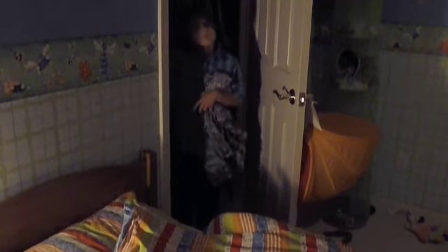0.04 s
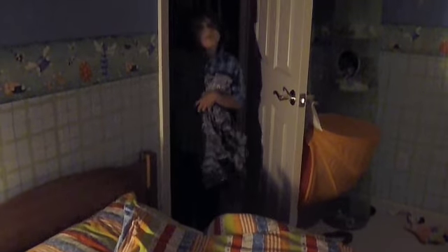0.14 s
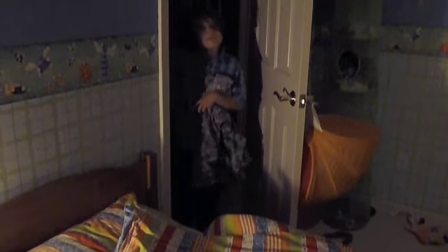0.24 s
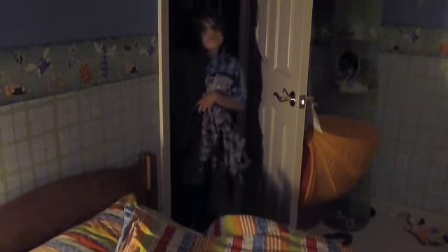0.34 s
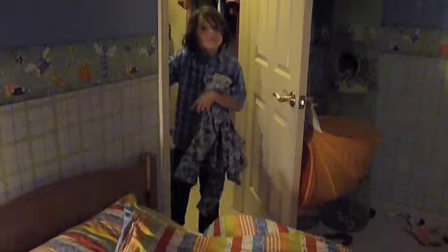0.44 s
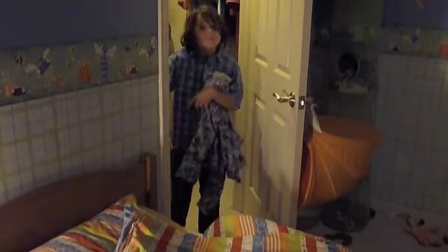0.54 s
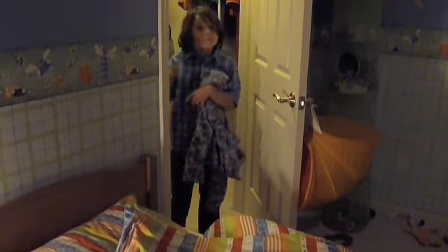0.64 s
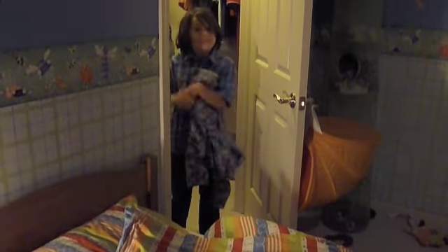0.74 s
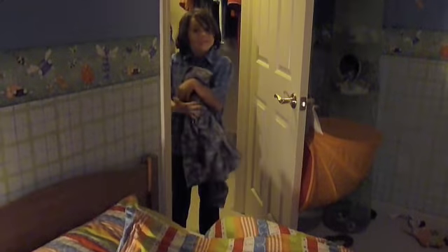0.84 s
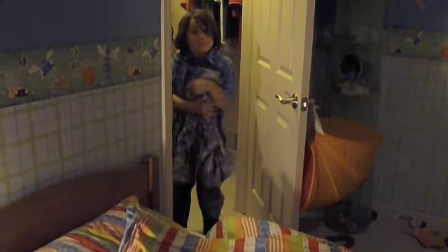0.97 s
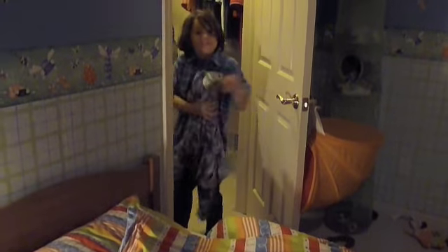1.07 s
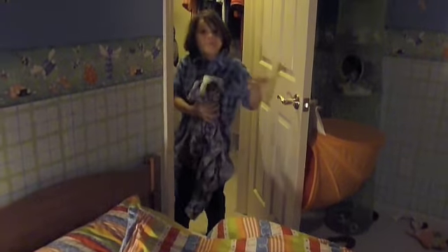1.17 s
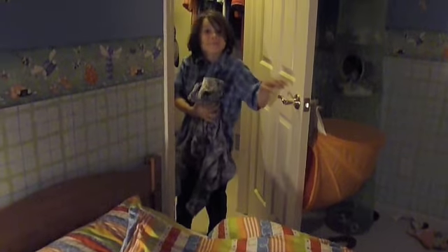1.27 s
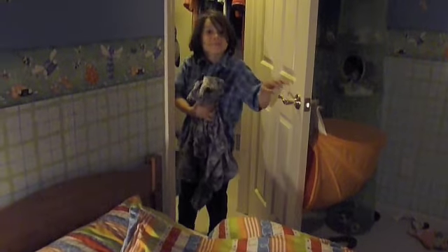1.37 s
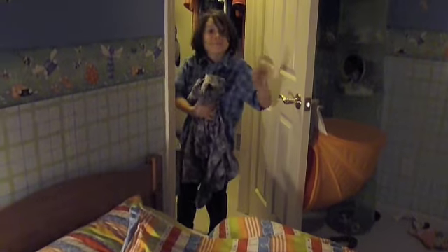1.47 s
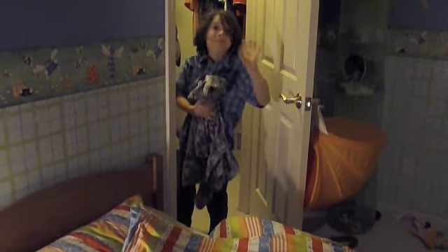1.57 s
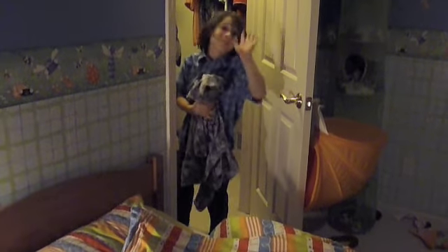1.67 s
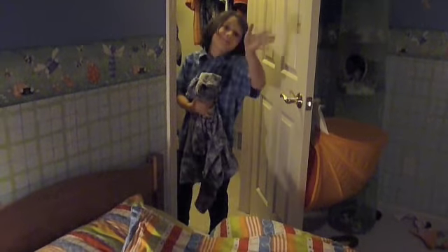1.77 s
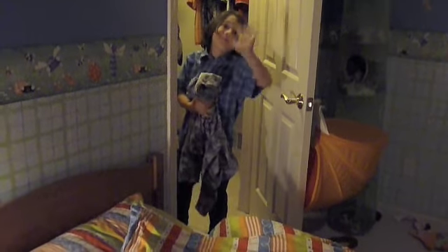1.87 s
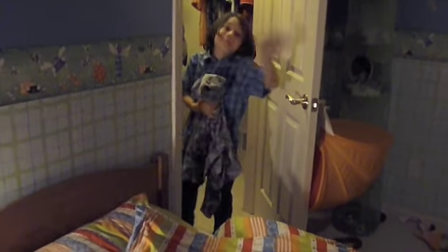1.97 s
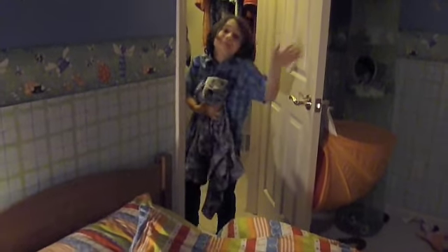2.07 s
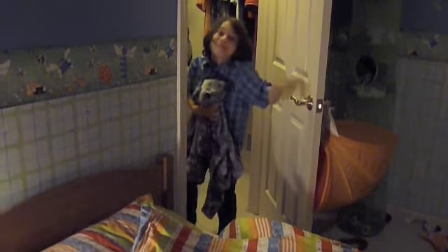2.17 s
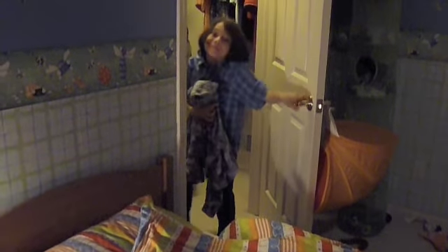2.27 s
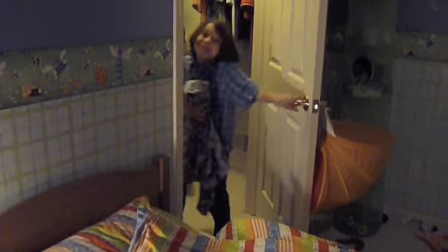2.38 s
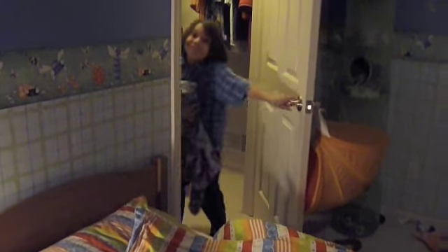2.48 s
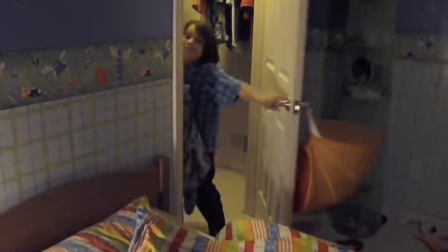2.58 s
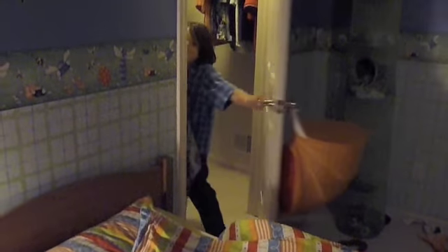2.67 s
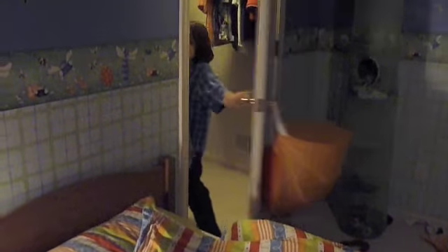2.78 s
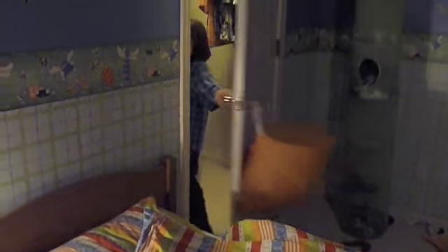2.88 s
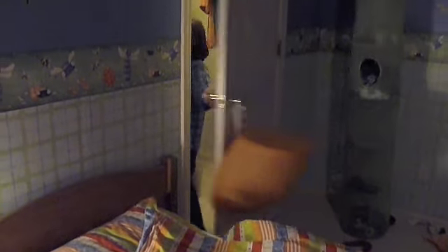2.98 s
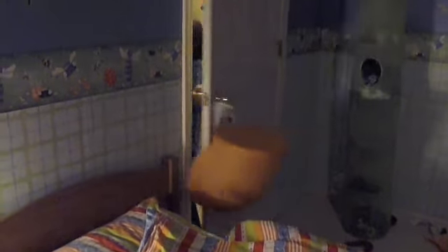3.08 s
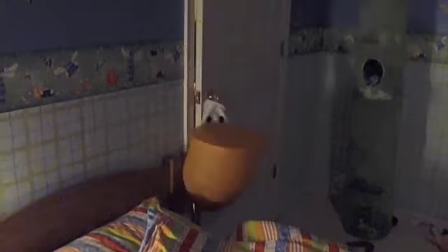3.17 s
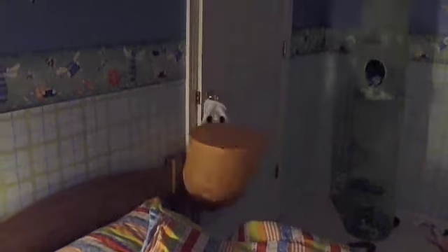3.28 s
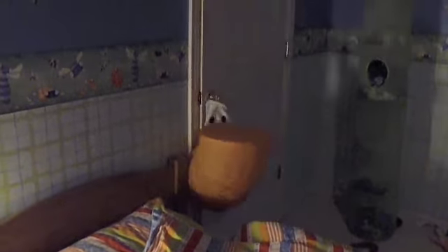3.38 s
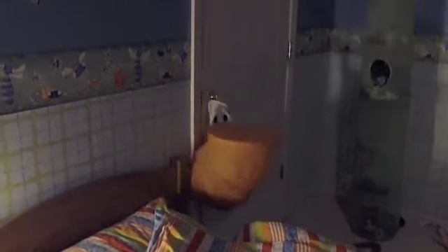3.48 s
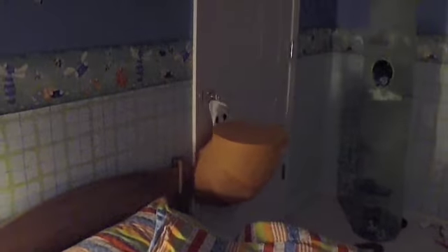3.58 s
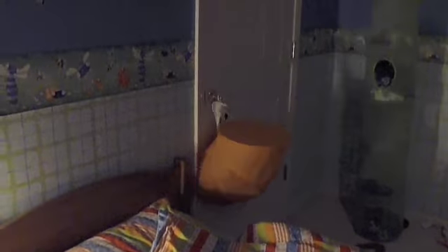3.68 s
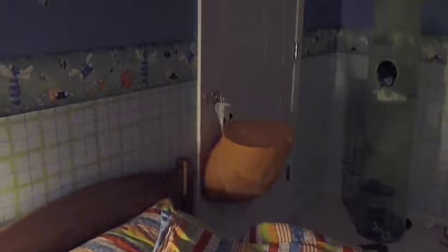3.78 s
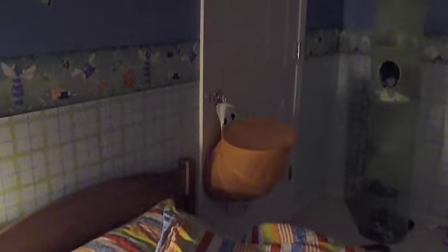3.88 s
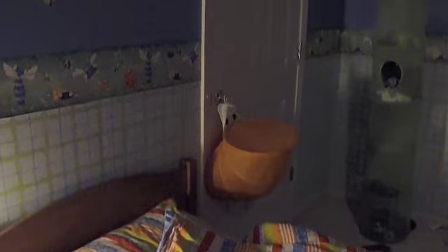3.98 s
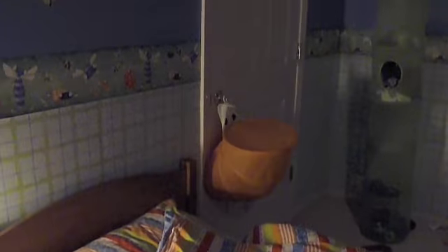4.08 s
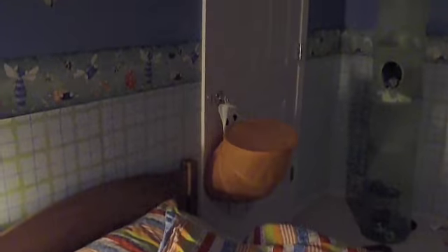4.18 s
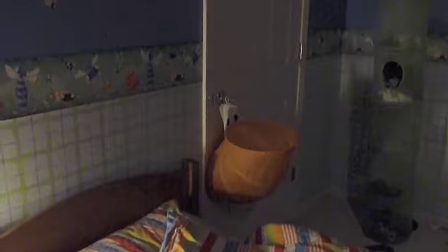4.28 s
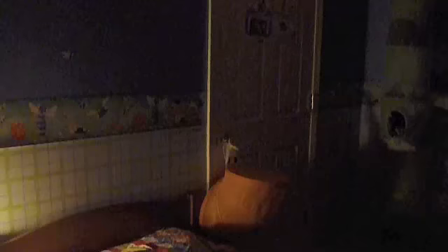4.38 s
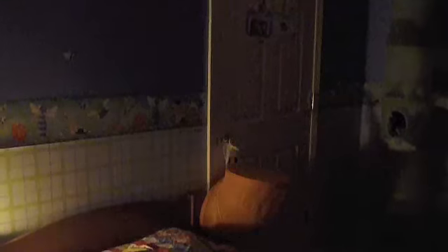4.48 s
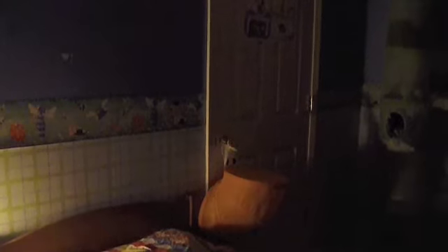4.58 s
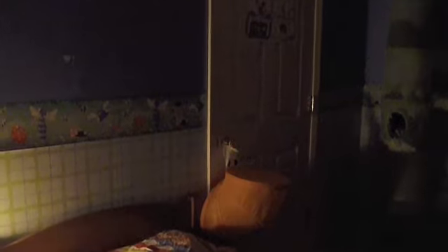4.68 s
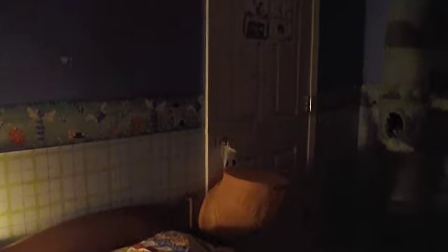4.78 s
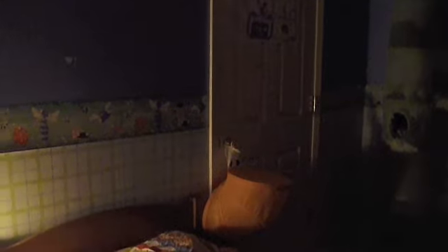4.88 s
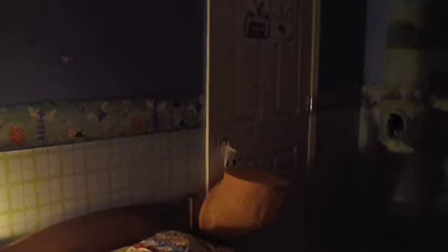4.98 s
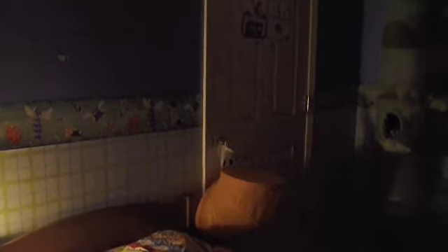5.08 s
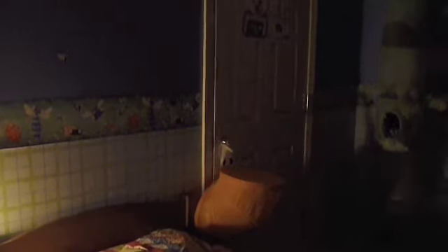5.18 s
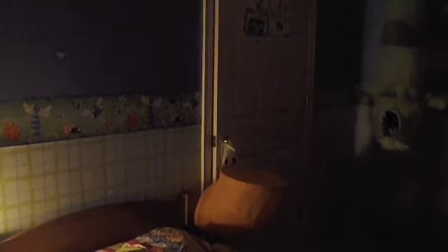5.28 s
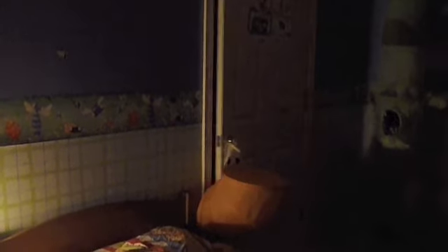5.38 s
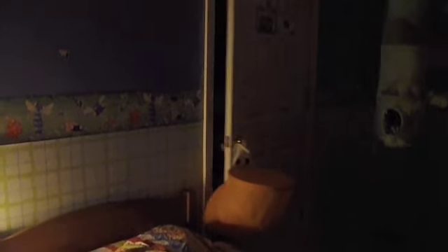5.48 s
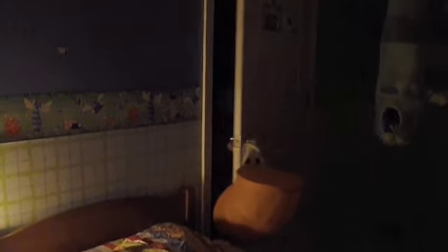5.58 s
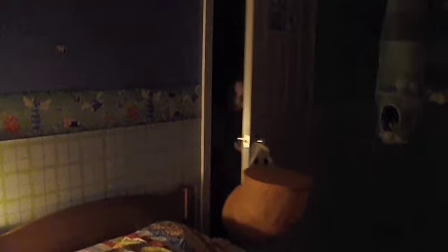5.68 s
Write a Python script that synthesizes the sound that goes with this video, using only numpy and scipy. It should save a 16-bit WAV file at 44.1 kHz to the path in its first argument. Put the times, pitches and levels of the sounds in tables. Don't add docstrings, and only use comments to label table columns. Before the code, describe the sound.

A light switch snaps, a door squeaks briefly and slams shut with latch clatter; after a short dip to silence, the handle rattles and the door eases open.

```python
import sys
import numpy as np
from scipy import signal
from scipy.fft import rfft, irfft
from scipy.io import wavfile
from scipy.ndimage import uniform_filter1d

SR = 44100
rng = np.random.default_rng(int(sys.argv[2]) if len(sys.argv) > 2 else 0)


def to_wav(sig):
    pcm = np.clip(np.atleast_2d(sig), -1, 1) * 32767
    pcm = np.round(pcm).astype(np.int16)
    wavfile.write(sys.argv[1], SR, pcm.T)


def amplitude_ratio(level_db):
    exponent = np.asarray(level_db, float) / 20
    return 10 ** exponent


N = 253154


def unit(x):
    return x / np.sqrt(np.mean(x ** 2))


def peak(x, db):
    return x * amplitude_ratio(db) / np.abs(x).max()


def band(x, lo_hz, hi_hz):
    return signal.sosfilt(signal.butter(2, [lo_hz, hi_hz], "bandpass", fs=SR, output="sos"), x)


def colour(x, points):
    hz, db = np.transpose(points)
    f = np.arange(len(x) // 2 + 1) * SR / len(x) + 1
    return irfft(rfft(x) * amplitude_ratio(np.interp(np.log(f), np.log(hz), db)), len(x))


def walk(rate_hz):
    hold = int(SR / rate_hz)
    levels = np.repeat(rng.standard_normal(N // hold + 1), hold)
    return uniform_filter1d(uniform_filter1d(levels, hold), hold)[:N]


# frequency in Hz, density in dB per Hz.
HOUSE_SPECTRUM = [(18, -52), (30, -13.5), (101, -2), (161, -1), (292, -2), (313, -4), (368, -5.5),
                  (582, -9), (624, -7), (1530, -16.5), (1760, -18.5), (6510, -28), (7300, -28.5),
                  (9490, -44), (16100, -120)]


def house():
    noise = colour(rng.standard_normal(N), [(5, -71)] + list(HOUSE_SPECTRUM))
    low = signal.sosfilt(signal.butter(2, 900, fs=SR, output="sos"), noise)
    wander = amplitude_ratio(0.5 * walk(1) + 1.3 * walk(24))
    whine_hz, whine_db, house_db = 6700, -78.5, -50.5
    whine = unit(band(rng.standard_normal(N), 0.97 * whine_hz, 1.03 * whine_hz)) * amplitude_ratio(whine_db)
    return unit(noise + low * (wander - 1)) * amplitude_ratio(house_db) + whine


# frequency in Hz, reverberation time t60 in seconds.
ROOM_DECAY = [(60, 1), (250, 0.54), (1000, 0.37), (3000, 0.35), (7000, 0.43)]


def room(x):
    reverb_db, onset_s = -8.5, 0.0023
    t, tail = np.arange(SR // 2) / SR, 0
    decay_hz, decay_s = np.transpose(ROOM_DECAY)
    for hz in 45 * 2 ** np.arange(0, 8.0):
        t60 = np.interp(np.log(hz), np.log(decay_hz), decay_s)
        octave = band(rng.standard_normal(len(t)), hz / 2 ** 0.5, hz * 2 ** 0.5)
        tail = tail + octave * np.exp(-np.log(1000) * t / t60)
    tail = tail * np.clip(t / onset_s, 0, 1)
    tail = tail / np.sqrt(np.sum(tail ** 2))
    return x + amplitude_ratio(reverb_db) * signal.fftconvolve(x, tail)[:N]


# start in seconds, hold in seconds, level in dB, tilt in dB, fade in dB per second.
DRAGS = [
    (2.211, 0.0062, -39.5, -6.5, 403),
    (2.402, 0.25, -45.5, 1, 54.5),
    (2.975, 0.045, -40.5, -5, 84),
    (3.211, 0.61, -38, 3, 88.5),
    (5.076, 0.059, -43, -3.2, 40),
    (5.36, 0.074, -44.5, 7, 77),
]


def drag():
    attack_s = 0.048
    out, t = 0, np.arange(N) / SR
    grains = unit(rng.standard_normal(N) * amplitude_ratio(1.7 * walk(200)))
    rumble, rustle = unit(band(grains, 140, 850)), unit(band(grains, 720, 4500))
    for start_s, hold_s, db, tilt_db, fade in DRAGS:
        age = t - start_s
        rise = np.clip(age / attack_s, 0, 1)
        gain = rise * amplitude_ratio(db - 5.5 - fade * np.clip(age - attack_s - hold_s, 0, 2))
        out = out + gain * (rumble * amplitude_ratio(-tilt_db) + rustle * amplitude_ratio(tilt_db - 22))
    return out


def mode(push, hz, t60):
    t = np.arange(len(push)) / SR
    ringing = np.sin(2 * np.pi * hz * t) * np.exp(-np.log(1000) * t / t60)
    return signal.fftconvolve(push, ringing)[:len(t)]


def rings(rows, t60, swell_ms, split):
    out, t = np.zeros(N + SR), np.arange(SR // 2) / SR
    middle_hz = np.median([row[2] for row in rows])
    for start_s, db, hz in rows:
        decay_s = t60 * (middle_hz / hz) ** 0.3
        roughness = 1 + 0.5 * rng.standard_normal(len(t))
        push = roughness * np.sin(2 * np.pi * hz * t) * np.exp(-1000 * t / swell_ms)
        twin_hz = hz * (1 + split * rng.uniform(-1.41, 1))
        pair = mode(push, hz, decay_s) + 0.94 * mode(push, twin_hz, decay_s)
        start = int(start_s * SR)
        out[start:start + len(t)] += peak(pair, db - 3)
    return out[:N]


# start in seconds, peak level in dB, pitch in Hz.
PUFFS = [
    (2.239, -53, 40.4),
    (3.049, -42, 40.4),
    (3.299, -46.5, 40.4),
    (3.605, -35, 40.4),
    (3.849, -44.5, 64),
    (4.199, -49, 59.2),
    (5.099, -48, 45.8),
    (5.279, -45.5, 70.0),
    (5.649, -61, 40.4),
]


def air_puffs():
    return rings(PUFFS, t60=0.19, swell_ms=26, split=0.3)


# start in seconds, peak level in dB, pitch in Hz.
PLATE = [
    (.397, -33.5, 1690),
    (.40, -46.5, 3370),
    (1.29, -50, 1495),
]


def switch_plate():
    return rings(PLATE, t60=0.058, swell_ms=2.4, split=0.03)


# start in seconds, peak level in dB, pitch in Hz.
PINGS = [(.394, -29.5, 755), (.399, -55, 4750), (2.236, -26, 619), (3.183, -25.5, 2460), (3.184, -32, 3720),
         (3.333, -30, 4070), (3.333, -28.5, 1130), (3.339, -28.5, 1990), (3.607, -19.5, 1111),
         (3.608, -16, 768), (3.611, -24.5, 1460), (5.054, -43, 3250), (5.10, -44.5, 2600),
         (5.165, -41, 2980), (5.175, -29.5, 1222), (5.197, -29, 990), (5.445, -43, 2600), (5.615, -37, 773),
         (5.635, -40.5, 1140)]


def metal_pings():
    return rings(PINGS, t60=0.034, swell_ms=2.3, split=0.07)


# start in seconds, peak level in dB, pitch in Hz.
DRUMS = [(0.409, -40, 274), (2.248, -30.5, 268), (2.288, -27.5, 231), (2.459, -30.5, 270),
         (2.999, -29, 189.4), (3.181, -31, 289), (3.191, -32, 454), (3.334, -20.5, 322),
         (3.363, -18, 280.5), (3.409, -34, 333), (3.611, -17, 224.4), (3.669, -26, 194), (3.949, -23, 386),
         (3.989, -32.5, 381), (5.07, -33, 199), (5.249, -31.5, 173.5), (5.394, -33, 447)]


def panel_drums():
    return rings(DRUMS, t60=0.088, swell_ms=4.6, split=0.23)


# start in seconds, peak level in dB, pitch in Hz.
BOOMS = [(2.251, -40.5, 73), (2.309, -32, 71.6), (2.992, -38.5, 90), (3.059, -49, 97.04), (3.181, -37, 130),
         (3.338, -51.5, 79), (3.606, -24.5, 106.2), (3.65, -23.5, 136.3), (3.698, -26.5, 64),
         (3.757, -35, 70), (4.299, -42.5, 101), (4.541, -42, 118.3), (5.058, -42.5, 109),
         (5.169, -41, 125.4), (5.26, -39, 137.7)]


def leaf_booms():
    return rings(BOOMS, t60=0.27, swell_ms=10, split=0.16)


# frequency in Hz, swell in dB, width in Hz.
HINGE_PEAKS = [(1370, -2, 16), (2410, 9.5, 54), (2740, 8, 73), (2945, 12, 54), (3190, 9.5, 69)]


def hinge(rows, fall_db, waver, flutter_db, haze):
    s, *columns = np.transpose(rows)
    t = np.arange(N) / SR
    slip_hz, db = (np.interp(t, s, column) for column in columns)
    phase = 2 * np.pi * np.cumsum(slip_hz * (1 + waver * walk(700))) / SR
    swell_db = 0
    for at_hz, rise_db, width_hz in HINGE_PEAKS:
        swell_db = swell_db + rise_db * np.exp(-((slip_hz - at_hz) / width_hz) ** 2 / 2)
    grit = 1 + haze * walk(1500)
    overtones = 0
    for k in range(1, 6):
        level = amplitude_ratio(db + k * fall_db + flutter_db * walk(150))
        overtones = overtones + level * np.sin((k + 1) * phase)
    lowest = amplitude_ratio(db + swell_db + flutter_db * walk(120)) * np.sin(phase)
    moving = (t > s[0]) * (t < s[-1])
    return band((lowest + overtones * grit) * moving, 220, 5800)


# time in seconds, slip rate in Hz, level in dB.
GROAN = [
    (2.432, 1050, -50),
    (2.441, 900, -38),
    (2.468, 330, -39),
    (2.485, 280, -52),
]


def hinge_groan():
    return hinge(GROAN, fall_db=-14, waver=0.03, flutter_db=1.5, haze=0.3)


# time in seconds, slip rate in Hz, level in dB.
SQUEAK = [
    (2.472, 1534, -64),
    (2.484, 1343, -43.5),
    (2.513, 1435, -41),
    (2.534, 2033, -41.5),
    (2.588, 2600, -41),
    (2.648, 3227, -44),
    (2.69, 3457, -50),
    (2.73, 3350, -65),
    (2.83, 3320, -75.5),
]


def hinge_squeak():
    grip_lost_s, fade_s = 2.646, 0.026
    fall_db = np.interp(np.arange(N) / SR, [grip_lost_s, grip_lost_s + fade_s], [-2, -30])
    return hinge(SQUEAK, fall_db, waver=0.012, flutter_db=3.5, haze=0.6)


def cluster(push, lo_hz, hi_hz, t60):
    keep = np.exp(-np.log(1e6) / (t60 * SR))
    power = signal.lfilter([1], [1, -keep], push ** 2)
    return band(rng.standard_normal(len(push)) * np.sqrt(power), lo_hz, hi_hz)


def rebounds(bounces):
    return [(start_s + k * gap_ms / 1000, db - k * 3.5, hard_db)
            for start_s, db, hard_db, gap_ms in bounces for k in range(3)]


def contacts(hits, panel_db, tick_db, sheen_db, scatter_ms, thinning, dryness=1):
    out, t = np.zeros(N + SR), np.arange(SR // 3) / SR
    for start_s, db, hard_db in hits:
        age = 1000 * t / scatter_ms
        push = rng.standard_normal(len(t)) ** 3 * np.exp(-age) * np.clip(11 * age + 0.16, 0, 1)
        clusters = [
            (150, 461, 0.13, panel_db - thinning * hard_db - 0.5),
            (447, 1440, 0.063, 0),
            (1860, 3740, 0.071, tick_db + hard_db),
            (3500, 6700, 0.042, sheen_db + hard_db)]
        start = int(start_s * SR)
        for lo_hz, hi_hz, t60, part_db in clusters:
            part = cluster(push, lo_hz, hi_hz, t60 * dryness)
            out[start:start + len(t)] += peak(part, db - 3 + part_db)
    return out[:N]


# start in seconds, peak level in dB, hardness in dB.
BATTEN_HITS = [
    (2.448, -33.5, -4),
    (3.479, -34.5, -3),
    (3.545, -33, -2),
    (5.426, -31.5, 12),
    (5.489, -47, 11),
]
# start in seconds, first peak in dB, hardness in dB, gap in ms.
BATTEN_BOUNCES = [(3.209, -25.5, 3, 35.7)]


def door_stop():
    return contacts(list(BATTEN_HITS) + rebounds(BATTEN_BOUNCES), panel_db=-11.5, tick_db=-19.5,
                    sheen_db=-36, scatter_ms=12.5, thinning=0.8)


# start in seconds, peak level in dB, hardness in dB.
HOLLOW_HITS = [(0.104, -44.5, 5), (0.439, -52, 1), (2.271, -57, -3), (2.301, -57, -9), (3.624, -26, -10),
               (3.946, -28, 1.1), (4.029, -47, -8), (4.33, -39.5, -6), (4.532, -40, 1)]
# start in seconds, first peak in dB, hardness in dB, gap in ms.
HOLLOW_BOUNCES = [
    (3.664, -22.5, 0.1, 27.09),
    (5.195, -36, 0.077, 27.15),
]


def hollow_bumps():
    return contacts(list(HOLLOW_HITS) + rebounds(HOLLOW_BOUNCES), panel_db=6, tick_db=-13.5,
                    sheen_db=-23, scatter_ms=9.5, thinning=0.55)


# start in seconds, peak level in dB, hardness in dB.
METAL_HITS = [(1.028, -44, 0), (2.227, -44, 9), (2.42, -30, 0.7), (2.432, -29.5, 1.5), (2.969, -28.5, -4),
              (3.182, -20.5, -4), (3.419, -36.5, -1.5), (3.602, -22, 6), (3.808, -40.5, 7),
              (3.984, -39.5, 1.7), (5.393, -43, 0), (5.45, -41, 3.5)]
# start in seconds, first peak in dB, hardness in dB, gap in ms.
METAL_BOUNCES = [(3.344, -25.5, 4.4, 22.91)]


def metal_rattle():
    return contacts(list(METAL_HITS) + rebounds(METAL_BOUNCES), panel_db=-7, tick_db=-3.5,
                    sheen_db=-8, scatter_ms=9.5, thinning=2.1)


# start in seconds, peak level in dB, hardness in dB.
SNAPS = [(2.225, -27, -5.3), (2.432, -30, 10.5), (2.967, -31.5, -8.5), (3.182, -20.5, 6.3),
         (3.331, -17, 1.8), (3.607, -12.5, -6.5), (3.807, -38, 3), (4.305, -39, -4.5), (5.054, -32.5, 5),
         (5.158, -33, 1.5), (5.246, -38, 4), (5.418, -34, 5.5), (5.620, -49, -10)]


def latch_snaps():
    return contacts(SNAPS, panel_db=-24.5, tick_db=-4.5, sheen_db=-16.5, scatter_ms=1,
                    thinning=3.7, dryness=0.26)


# start in seconds, peak level in dB, hardness in dB.
WOOD_HITS = [(0.177, -57, 7), (1.297, -48, -9), (2.239, -43, -17), (2.978, -28.5, 3), (3.331, -26.5, 5),
             (3.605, -10, 1.2), (3.644, -23.5, -3), (3.941, -30, 3), (4.425, -33, -10), (5.161, -30, 6.5),
             (5.175, -26.5, -1), (5.267, -41, -6), (5.328, -45.5, 0)]
# start in seconds, peak level in dB, hardness in dB.
FIRST_TOUCHES = [
    (0.391, -38, 6),
    (2.411, -38, 5),
    (3.329, -34.5, 3.5),
    (5.607, -43, 6),
]
# start in seconds, first peak in dB, hardness in dB, gap in ms.
WOOD_BOUNCES = [(0.393, -30, -5.5, 6.5), (3.019, -34, 2, 47), (3.758, -35, 5, 44), (4.282, -36, 5, 15),
                (5.057, -32, 3, 20), (5.618, -34, -2, 12.5)]


def wood_knocks():
    hits = list(WOOD_HITS) + list(FIRST_TOUCHES) + rebounds(WOOD_BOUNCES)
    return contacts(hits, panel_db=-5.5, tick_db=-10.5, sheen_db=-24.5, scatter_ms=8, thinning=0.3)


def scene():
    friction = drag() + hinge_groan() + hinge_squeak()
    tones = air_puffs() + switch_plate() + metal_pings() + panel_drums() + leaf_booms()
    clatter = door_stop() + hollow_bumps() + metal_rattle() + latch_snaps() + wood_knocks()
    return (room(friction + tones + clatter) + house())[None]


def top_cut(x):
    return signal.sosfilt(signal.butter(12, 8020, fs=SR, output="sos"), x)


# time in seconds, gain as a ratio.
FADE = [
    (4.31, 1.0),
    (4.406, 0.011),
    (4.414, 0.089),
    (4.51, 1.0),
]


def record(dry):
    top_hz, offset = 7510, 0.0114
    cut = signal.sosfilt(signal.cheby2(10, 60, top_hz * 1.16, fs=SR, output="sos"), dry)
    s, gain = np.transpose(FADE)
    mix = (cut + offset) * np.interp(np.arange(N) / SR, s, gain)
    return top_cut(mix)


dry = scene()
out = record(dry)
to_wav(out)
```